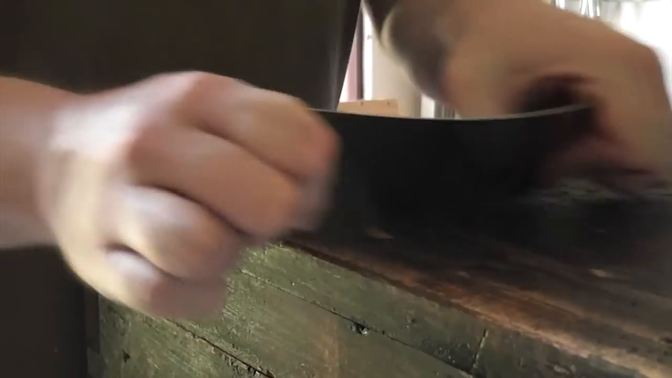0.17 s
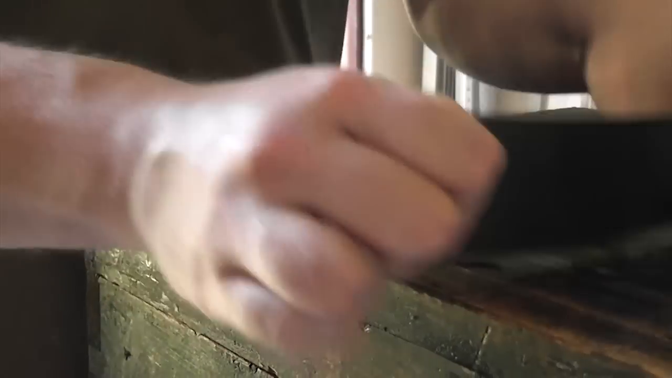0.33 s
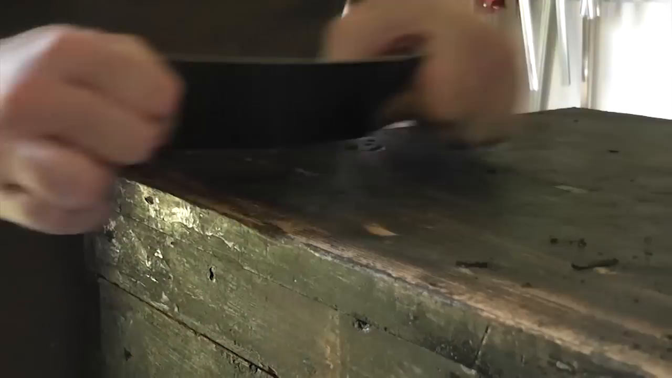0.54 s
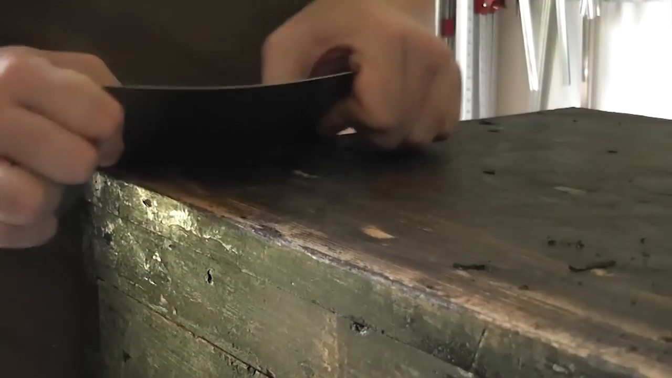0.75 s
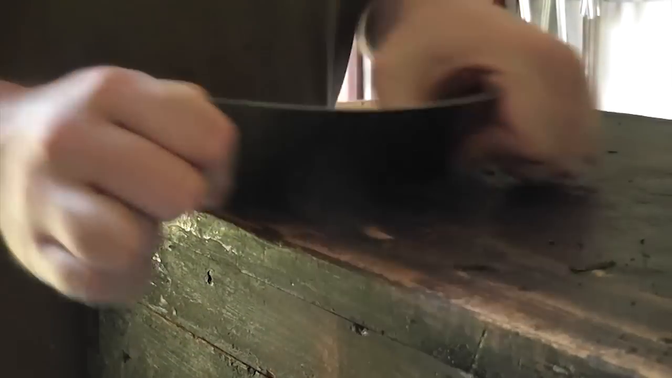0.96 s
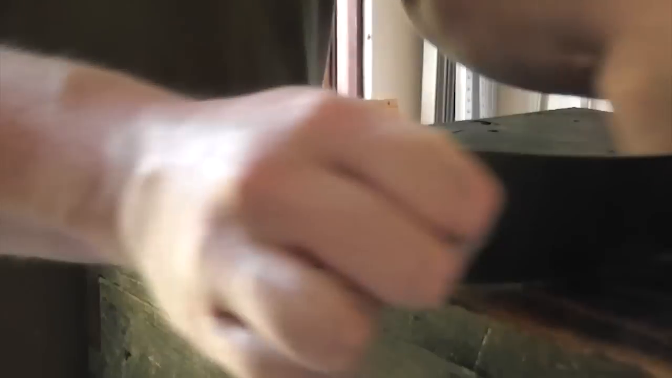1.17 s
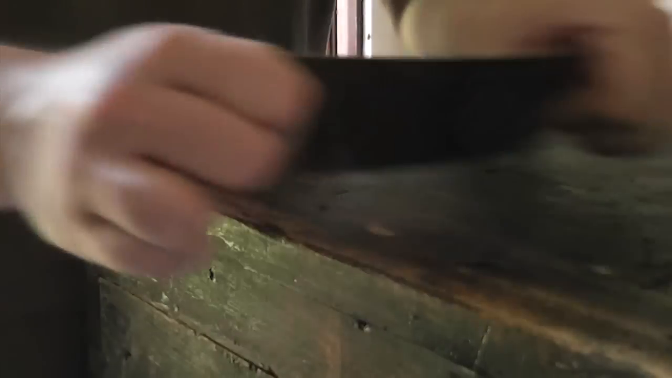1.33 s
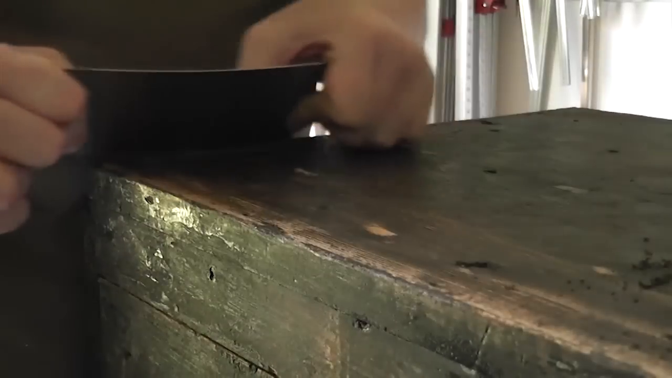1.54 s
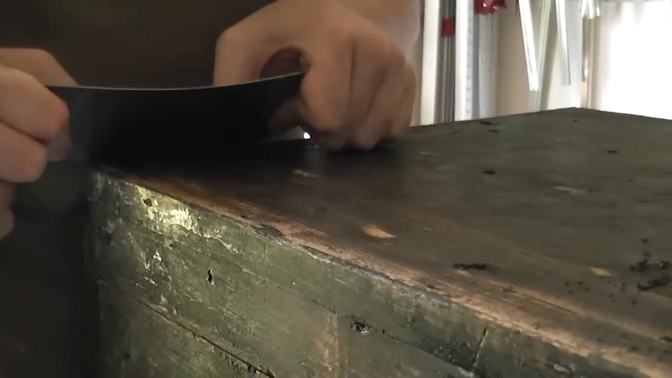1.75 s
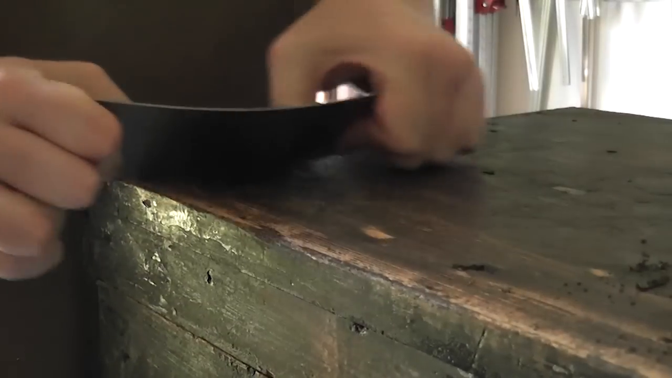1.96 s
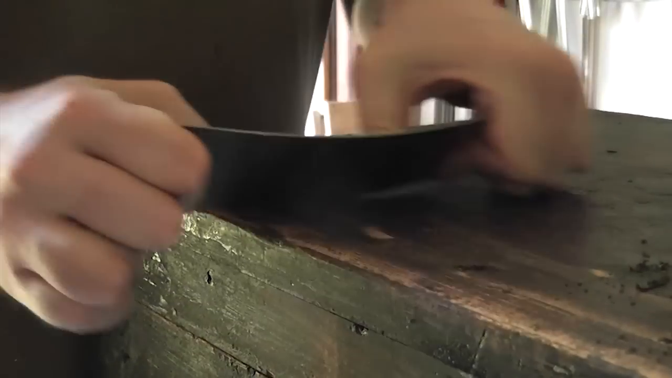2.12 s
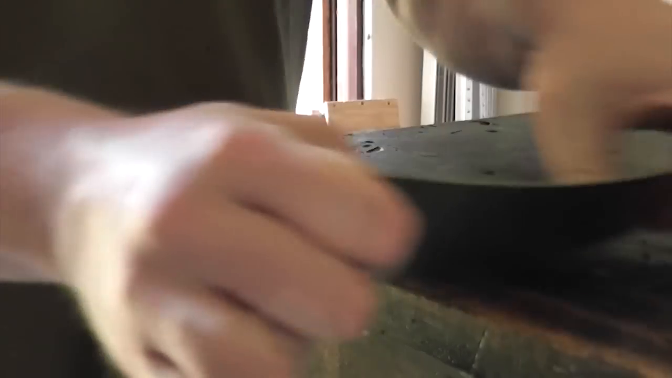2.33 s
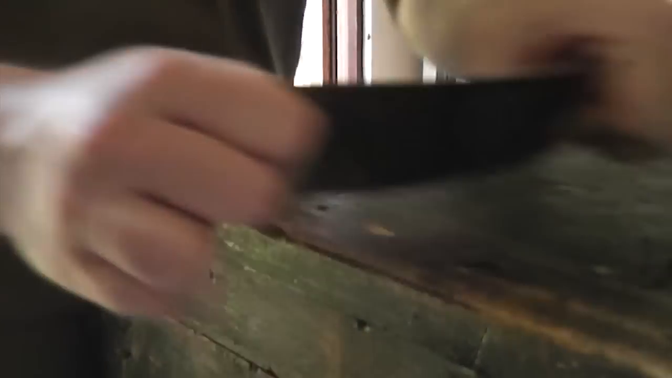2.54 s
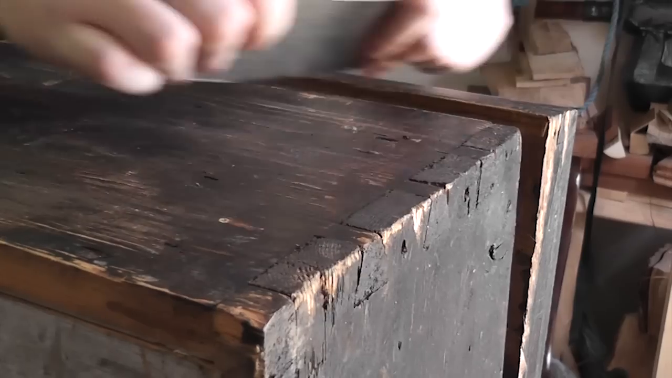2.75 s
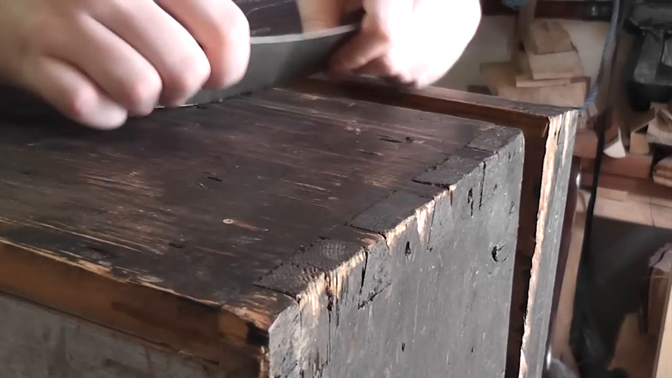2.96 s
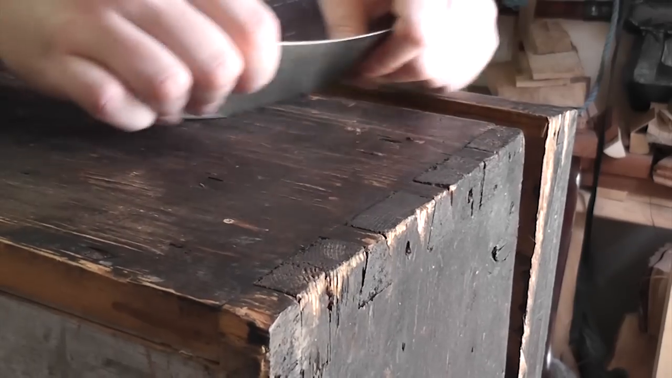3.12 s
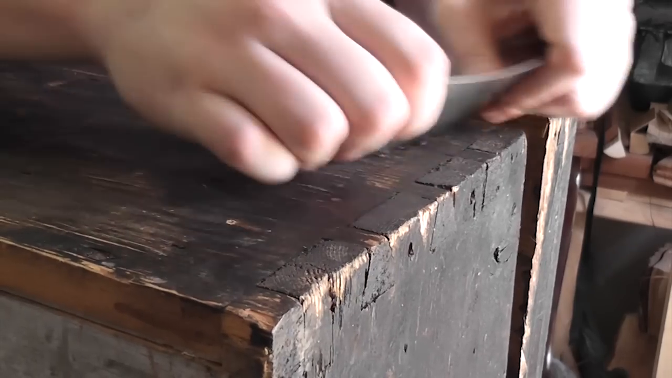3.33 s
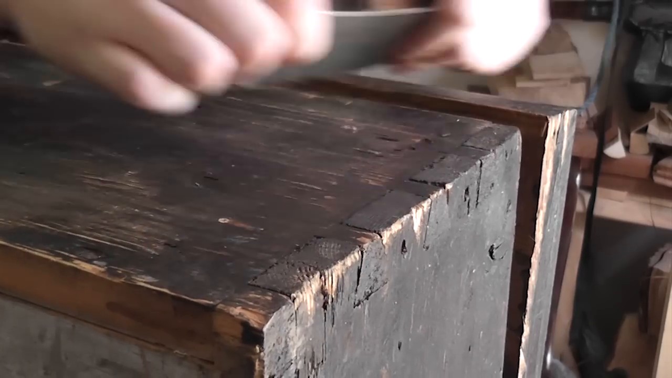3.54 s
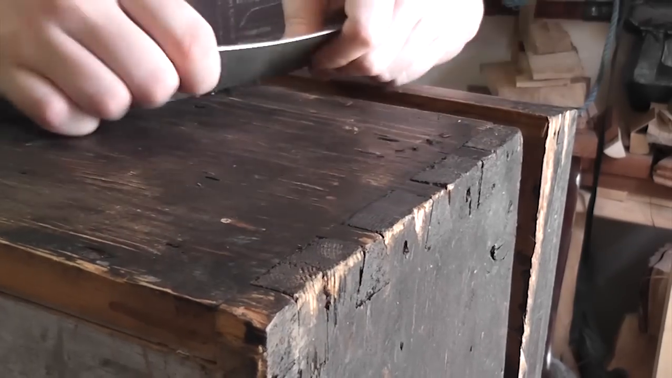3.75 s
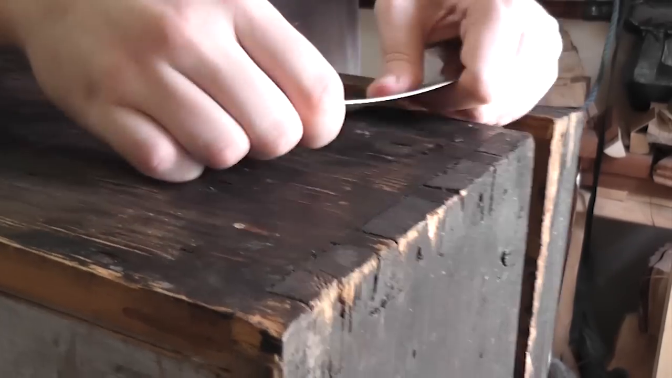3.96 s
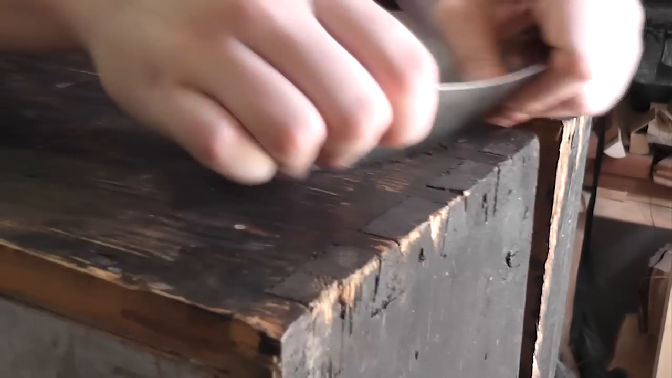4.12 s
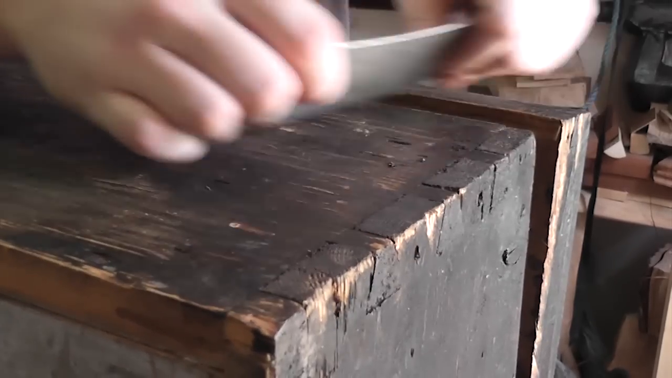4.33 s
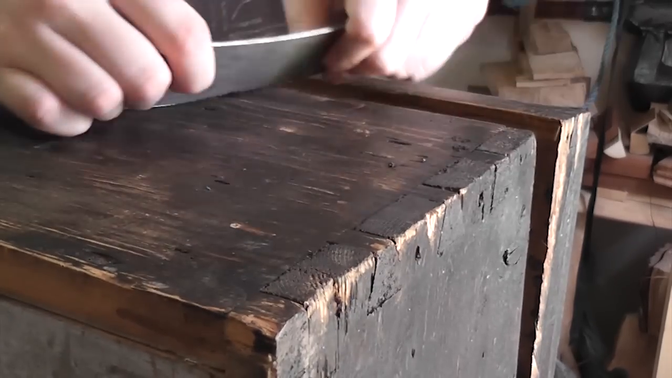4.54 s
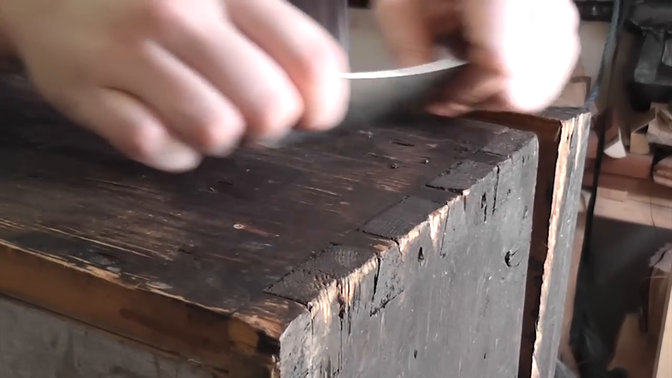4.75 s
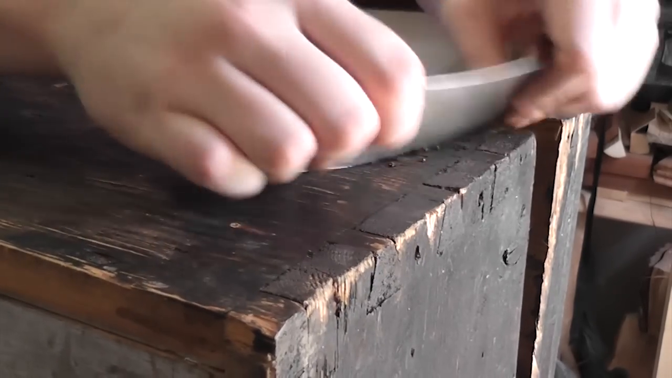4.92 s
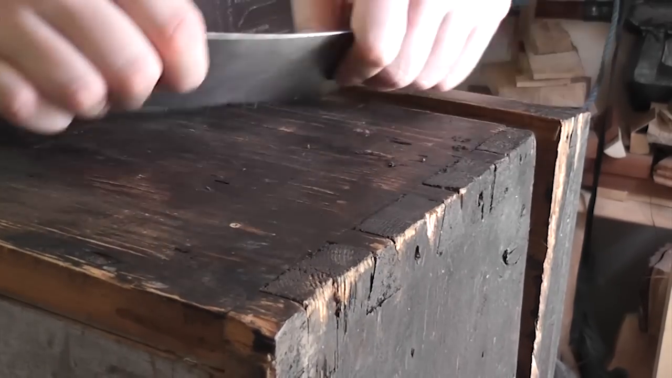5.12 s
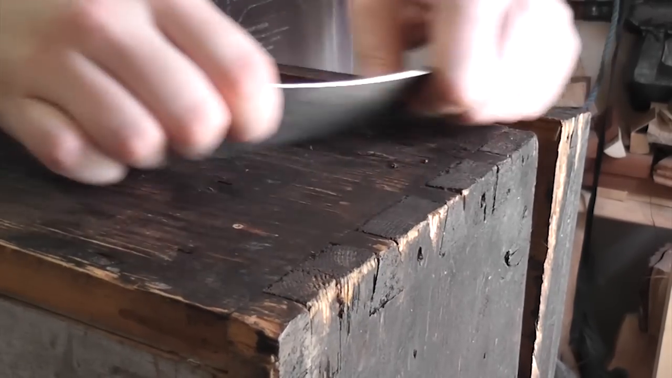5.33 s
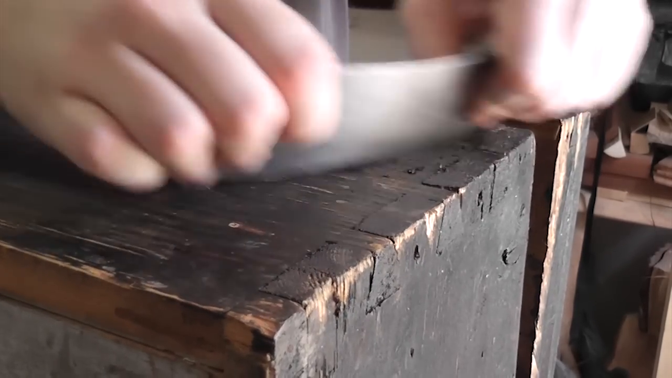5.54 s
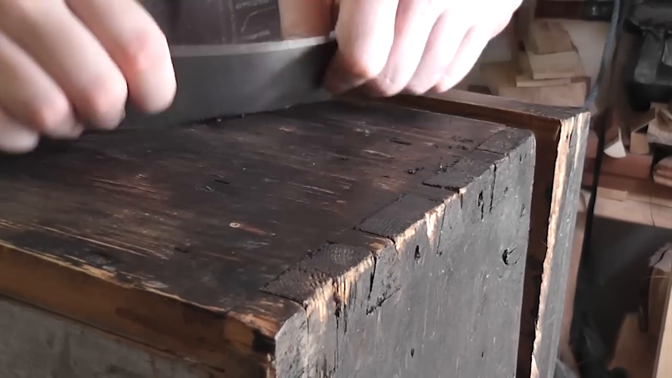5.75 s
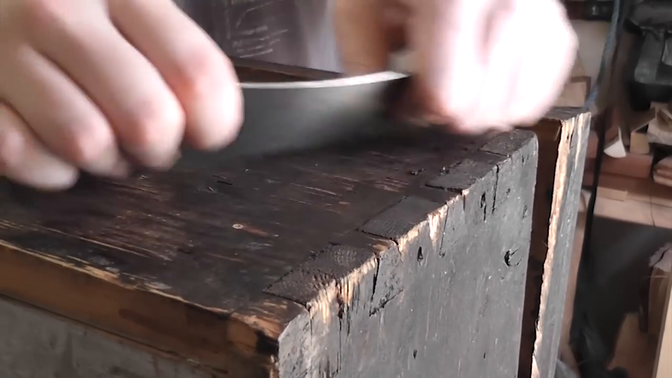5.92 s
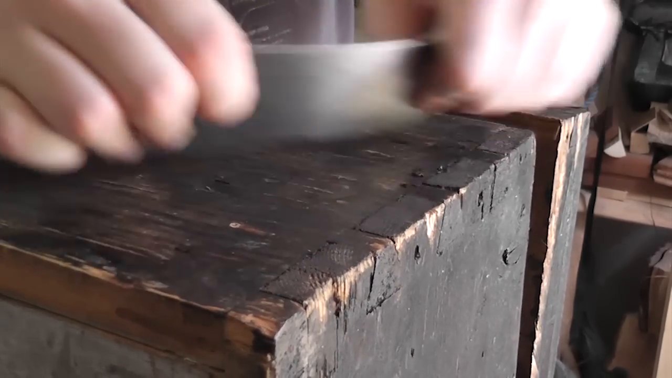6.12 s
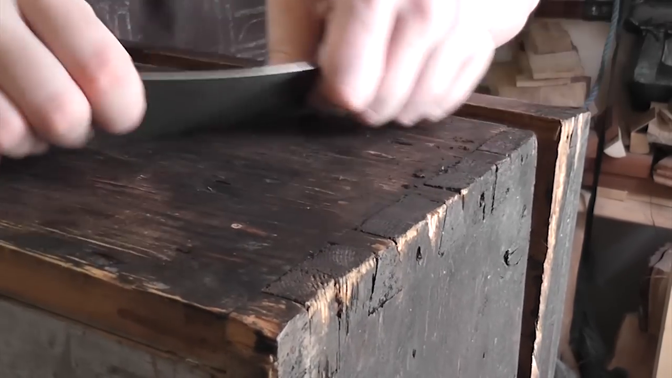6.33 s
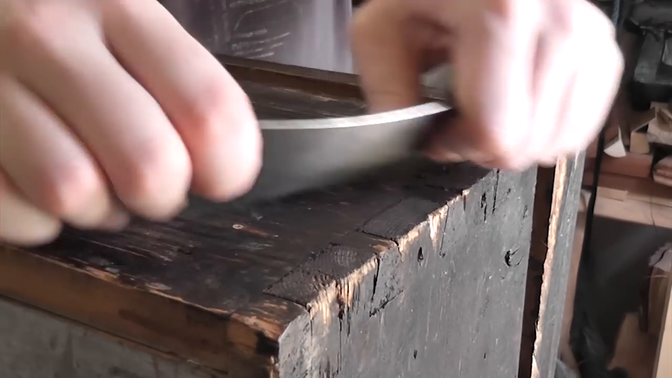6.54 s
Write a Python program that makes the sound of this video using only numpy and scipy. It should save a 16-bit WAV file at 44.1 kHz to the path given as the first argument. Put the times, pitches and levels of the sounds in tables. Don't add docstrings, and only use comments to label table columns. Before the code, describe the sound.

Gritty metal blade strokes hiss and buzz on hollow painted wood, slow at first, then short and hurried with frequent woody knocks.

```python
import sys
import numpy as np
from scipy import signal
from scipy.fft import rfft, irfft
from scipy.io import wavfile
from scipy.ndimage import uniform_filter1d

SR = 44100
rng = np.random.default_rng(int(sys.argv[2]) if len(sys.argv) > 2 else 0)


def how_loud(loudness_db):
    steps = np.asarray(loudness_db, float) / 20
    return 10 ** steps


def file_out(sig):
    cols = np.atleast_2d(sig).T
    lim = np.clip(cols, -1, 1)
    pcm = np.round(lim * 32767).astype(np.int16)
    wavfile.write(sys.argv[1], SR, pcm)


N = 294588
CUT_S = 2.64


def unit(x):
    return x / np.sqrt(np.mean(x ** 2))


def colour(x, table):
    hz, db = np.transpose(table)
    f = np.maximum(np.fft.rfftfreq(N, 1 / SR), 1)
    gain = how_loud(np.interp(np.log(f), np.log(hz), db))
    return unit(irfft(rfft(x) * gain, N))


def ring(x, hz, width_hz):
    return signal.lfilter(*signal.iirpeak(hz, hz / width_hz, fs=SR), x)


def walk(rate_hz):
    k = int(SR / rate_hz)
    held = np.repeat(rng.standard_normal(N // k + 1), k)
    return 1.297 * uniform_filter1d(uniform_filter1d(held, k), k)[:N]


# f/Hz, density/dB per Hz
YARD_SPECTRA = [
    [(15, -44), (25, -24), (60, -9), (115, -14.5), (306, -15), (349, -12), (429, -9.5), (488, -6.5), (665, -8.5), (718, -6.5), (954, -9.5), (1170, -9), (1520, -23.5), (5530, -37), (12000, -42), (15600, -81), (22000, -120)],
    [(15, -41), (25, -19), (84, -5.5), (231, -12), (475, -8), (1820, -15.5), (3950, -22.5), (10800, -42), (12000, -49), (15600, -79), (22000, -120)],
]
YARD_RMS_DB = (-40.5, -47.5)


def yard(first):
    mid, side = rng.standard_normal((2, N))
    opposed = np.array([[1], [-1]])
    places = []
    for spectrum, rms_db in zip(YARD_SPECTRA, YARD_RMS_DB):
        stereo = colour(mid, spectrum) + 0.32 * colour(side, spectrum) * opposed
        places.append(how_loud(rms_db) * stereo)
    return np.where(first, *places) * how_loud(0.4 * walk(4.5))


def room(x):
    t60_s, level_db, low_hz, high_hz = 0.13, -7.5, 380, 2080
    t = np.arange(SR // 2) / SR
    tail = rng.standard_normal((2, len(t))) * how_loud(-60 * t / t60_s) * (t > .002)
    tail = signal.lfilter(*signal.butter(2, [low_hz, high_hz], "band", fs=SR), tail)
    tail /= np.sqrt(np.sum(tail ** 2, axis=1, keepdims=True) * SR / 2 / high_hz)
    return how_loud(level_db) * signal.fftconvolve(x[None], tail, axes=1)[:, :N]


# t/s, blow/dB, tick/dB, thump/dB, contact/ms
LANDINGS = [(0.679, -2.5, -33, -21, 0.27), (1.691, -39, -61, -27.5, 0.45), (2.486, -21, -43, -10.5, 0.64),
            (2.678, -6.5, -52, -20, 1), (2.929, 0.5, -32.5, -26, 0.23), (3.079, -21, -48, -54, 0.31),
            (3.467, -5, -44, -31, 1), (3.767, 1.5, -27.5, -14, 0.13), (4.024, -12, -34, -27, 0.5),
            (4.152, 1.5, -32, -22, 1), (4.294, -15.5, -33.5, -24, 0.5), (4.576, 0, -22, -13.5, 0.15),
            (4.942, -10, -34, -31, 0.53), (5.071, -8, -47, -29, 0.5), (5.196, -9, -40, -30, 0.29),
            (5.593, -21, -46, -20, 0.4), (5.757, -13, -38, -48, 0.29), (6.279, -11.5, -29, -39, 1)]


def blows():
    out = np.zeros(N)
    t = np.arange(SR // 4) / SR
    modes = BIG_PANELS + LID_LOW + LID_HIGH + BLADE_MODES
    hz, width_hz, struck_db = np.transpose([(m[0], m[1], m[-1]) for m in modes])
    big = hz < 230
    rings = np.exp(-np.pi * np.outer(width_hz, t)) * np.sin(2 * np.pi * np.outer(hz, t))
    rings[big] *= 1 - np.exp(-(t / .006) ** 2)
    sign = (-1) ** np.arange(len(hz))
    spot_db = rng.standard_normal((len(LANDINGS), len(hz)))
    fade = np.exp(-t / 0.0023) + 0.31 * np.exp(-t / 0.019)
    ticks = rng.standard_normal((len(LANDINGS), len(t))) * fade
    ticks = signal.lfilter(*signal.butter(2, [1500, 4500], "band", fs=SR), ticks)
    for (s, db, tick_db, thump_db, ms), scatter_db, tick in zip(LANDINGS, spot_db, ticks):
        push = np.hanning(max(int(ms * SR / 1000), 2) + 2)
        blow_db = np.where(big, thump_db + 16.5, db - 5)
        gain = sign * how_loud(struck_db + scatter_db + blow_db)
        hit = np.convolve(gain @ rings, push / push.sum())[:len(t)]
        hit = hit + how_loud(tick_db + 8.5) * tick
        i = int(s * SR)
        out[i:i + len(t)] += hit[:N - i]
    return out


def chips(spread_db, chatter_db):
    size = how_loud(spread_db * rng.exponential(size=N) + chatter_db * walk(60))
    return unit(rng.standard_normal(N) * size)


def rasped(modes, force_db, first, wander_db, dulling):
    tilt_db = dulling * np.clip(force_db + 26.0, -20, 0)
    grit = chips(spread_db=2.0, chatter_db=1.5)
    out, power = 0, 0
    for k, (hz, width_hz, first_db, second_db, _) in enumerate(modes):
        free = ring(grit, hz, width_hz) ** 2
        even = (free.mean() / uniform_filter1d(free, int(.06 * SR))) ** 0.24
        reach_db = np.where(first, first_db, second_db) + wander_db * walk(9)
        reach_db = reach_db + tilt_db * np.log2(hz / modes[2][0])
        out = out + (-1) ** k * ring(grit * even * how_loud(force_db + reach_db), hz, width_hz)
        power += free.mean() * how_loud(first_db + second_db)
    return out / np.sqrt(power)


# f/Hz, width/Hz, rasped at first place/dB, at second/dB, struck/dB
BIG_PANELS = [(98.6, 29, -9, -11.5, -44), (123.4, 40, -6, -47, -24.5), (162.8, 26.6, 4, 4.5, -19.5),
              (196, 92, -8, -18.5, -36)]
LID_LOW = [(272.2, 13.7, -2, -11.5, -15.5), (295.7, 15.3, -14, -4.5, -13), (327.8, 20.6, 1.5, 0.5, -17),
           (400.3, 39.4, -11.5, -8, -6), (462, 132, -11, -10.5, -15), (571.8, 29.4, -7, -4, -23),
           (637, 24, -8.5, -9.5, -17)]
LID_HIGH = [(755, 62, 2.5, 2, -6), (889, 150, 0.5, 0.5, -6.5), (1064, 92, 2.5, 3.5, -10.5),
            (1207, 109, 3.5, 3, -4.5), (1326, 78, 4.5, 1.5, -12), (1523, 93, 1, -0.5, -13.5),
            (1740, 320, -4.5, -4.5, -33), (2010, 98, -8, -10, -20.5), (2320, 180, -11, -10.5, -35)]


def chest(buzz_db, drone_db, thump_db, first):
    buzz = rasped(LID_HIGH, buzz_db, first, wander_db=1.9, dulling=0.29)
    drone = rasped(LID_LOW, drone_db, first, wander_db=3.0, dulling=0.04)
    thump = rasped(BIG_PANELS, thump_db, first, wander_db=3.5, dulling=0.055)
    return buzz + drone + thump


def sheet(x, t60_s, wet):
    t = np.arange(SR // 20) / SR
    tails = rng.standard_normal((2, len(t))) * how_loud(-60 * t / t60_s)
    tails /= np.linalg.norm(tails, axis=1, keepdims=True)
    a, b = signal.oaconvolve(x[None], tails, axes=1)[:, :N]
    bend_rad = 2.47 * walk(7)
    return x + wet * (np.cos(bend_rad) * a + np.sin(bend_rad) * b)


# f/Hz, width/Hz, rasped/dB, struck/dB
BLADE_MODES = [(2670, 320, 3, -37), (3150, 310, -4.5, -12), (3750, 100, -7.5, -23), (5760, 340, -19, -40),
               (8360, 74, -55, -50), (12000, 340, -20, -50)]
# f/Hz, density/dB per Hz
HISS_SPECTRA = [
    [(880, -48), (1500, 2), (2300, 1), (2550, -9), (3610, -1), (4220, -4), (5630, -4), (8550, -7.5), (11200, -5.5), (12000, -6), (15600, -63), (22000, -120)],
    [(880, -29), (1500, -3.5), (2090, -1), (2510, -11.5), (3640, -6), (4570, -11), (6300, -10.5), (8180, -13), (11100, -8), (12000, -12), (15600, -73), (22000, -120)],
]


def burr(force_db, top_db, first):
    grit = chips(spread_db=1.0, chatter_db=0.67)
    hiss = np.where(first, colour(grit, HISS_SPECTRA[0]), colour(grit, HISS_SPECTRA[1]))
    hiss = hiss + sum(how_loud(db) * ring(hiss, hz, w) for hz, w, db, _ in BLADE_MODES)
    hiss = unit(sheet(hiss, t60_s=0.029, wet=0.64))
    fine = signal.filtfilt(*signal.butter(2, 6000, "high", fs=SR), hiss)
    shaped = hiss - fine + fine * how_loud(np.clip(top_db + 7.0, -25, 6))
    return shaped * how_loud(force_db)


def slope(t, start_s, top_s, ease_s, end_s):
    rise = (t - top_s) / max(top_s - start_s, 1e-3)
    fall = (ease_s - t) / max(end_s - ease_s, 1e-3)
    return 30 * np.minimum(np.minimum(rise, fall), 0)


# t/s, thump/dB, builds/s, dies/s
WEIGHT_SHIFTS = [(.1, -23, .07, 0.1), (.24, -32.5, .4, .3), (.382, -27.5, .15, .15),
                 (.688, -22.5, .03, 0.095), (.77, -39, .15, .1), (1.28, -26, .1, .1),
                 (1.69, -23.5, .012, 0.083), (1.85, -32.5, .1, .1), (2.06, -28.5, .12, .15),
                 (2.334, -29.5, 0.37, .16), (2.51, -23, 0.11, 0.11), (2.74, -32, 0.33, 0.15),
                 (2.938, -16.5, 0.014, 0.033), (3.04, -33.5, 0.12, 0.091), (3.15, -36, .15, 0.35),
                 (3.34, -33, 0.14, .2), (3.518, -24.5, .2, 0.2), (3.775, -26, 0.011, 0.065),
                 (4.03, -29, 0.082, 0.2), (4.18, -20, 0.11, 0.13), (4.33, -36.5, 0.25, .3),
                 (4.585, -32.5, .015, 0.13), (4.88, -29.5, .09, 0.23), (5.0, -29, 0.35, .25),
                 (5.28, -40, 0.23, .2), (5.612, -30, 0.075, 0.17), (5.81, -35, 0.13, .1),
                 (6.126, -33.5, .1, .04), (6.29, -33.5, 0.033, .05), (6.66, -33, 0.28, .2)]


def rocks(t):
    power = 0
    for s, db, builds_s, dies_s in WEIGHT_SHIFTS:
        power = power + how_loud(2 * (db + slope(t, s - builds_s, s, s, s + dies_s)))
    return power


# t/s, hiss/dB, lid buzz/dB, drone/dB, dies/s
SKIDS = [(.65, -42.5, -50, -46, .2), (.684, -37, -24.5, -22, 0.064), (1.585, -48, -55, -58, 0.14),
         (2.631, -46.5, -48, -36, 0.081), (2.682, -66, -33, -23.5, 0.085), (2.812, -62, -41, -45, .15),
         (2.868, -56, -55, -55, .1), (2.935, -55, -28.5, -24, .13), (3.026, -40.5, -36.5, -26.5, .1),
         (3.084, -36.5, -34, -26, .1), (3.124, -31.5, -30, -25.5, .1), (3.46, -54, -26.5, -20, 0.16),
         (3.611, -41.5, -40, -36.5, 0.14), (3.774, -47, -27, -24.5, 0.12), (4.03, -34, -23.5, -27.5, 0.12),
         (4.3, -45.5, -32, -30.5, 0.16), (4.389, -43, -46, -48, .3), (4.463, -41, -40, -42, 0.11),
         (4.582, -34.5, -21.5, -21, 0.086), (4.934, -33.5, -26, -19, 0.11), (5.196, -45, -30.5, -22, 0.13),
         (5.591, -39.5, -27, -24, .11), (5.755, -34.5, -25, -19.5, 0.12), (5.69, -52, -50, -42, 0.33)]


def slips(t):
    attack_s, tail_db, tail_stretch = 0.0095, -14.5, 2.8
    slip_bright_db = (-7, -10)
    power, bright = 0, 0
    for s, *levels_db, dies_s in SKIDS:
        rattle = how_loud(2 * slope(t, s - attack_s, s, s, s + dies_s))
        tail = how_loud(2 * (tail_db + slope(t, s - attack_s, s, s, s + tail_stretch * dies_s)))
        felt = how_loud(2 * np.array(levels_db))[:, None] * (rattle + tail)
        power = power + felt
        bright = bright + felt[0] * slip_bright_db[int(s > CUT_S)]
    return power, bright


# touches/s, bites/s, eases/s, off/s, hiss at bite/dB
EDGE_STROKES = [(-.2, .03, .355, .45, -27.5), (0.753, 0.816, 0.85, 0.96, -35.5),
                (0.787, 0.926, 1.245, 1.33, -26.5), (1.772, 1.903, 1.94, 2.2, -34),
                (1.794, 2.095, 2.415, 2.556, -28.5), (3.11, 3.186, 3.23, 3.35, -28.5),
                (3.172, 3.286, 3.375, 3.53, -27), (3.812, 3.902, 3.98, 4.13, -32),
                (4.073, 4.081, 4.167, 4.31, -33), (4.57, 4.713, 4.817, 5.08, -34),
                (5.065, 5.068, 5.107, 5.2, -27), (5.248, 5.291, 5.48, 5.615, -37),
                (5.842, 5.873, 6.06, 6.15, -29), (6.275, 6.279, 6.33, 6.42, -31.5),
                (6.374, 6.432, 6.72, 7.2, -27.5)]
# hiss swell/dB, lid buzz/dB, drone/dB, brightness at bite/dB
HAND_GRIP = [(0.5, -31.5, -29, -1), (-1, -31, -35, -7), (-2, -30.5, -30, -4), (-.8, -31.5, -32, -9.5),
             (2, -29, -28, -4), (0.5, -27.5, -22, -3), (1.5, -24.5, -26.5, -4), (0, -31.5, -29.5, 1.5),
             (9, -25.5, -24, -4.5), (11, -32, -31.5, -2), (1, -22.5, -26, -14), (14, -30, -31, 3),
             (5, -27.5, -31.5, -1), (-3, -26.5, -26, -5), (-1.5, -25, -33.5, -2.5)]


def strokes(t):
    press_s, linger_s = 0.049, 0.02
    lid_speed, drone_speed = 0.52, 0.23
    lid_swell, drone_swell = 0.71, 0.48
    arch_db = 2
    sag_db, thump_under_db = (-4.5, 0), (-11.5, -19)
    skid_db = -10
    wear_s, wear_db = 0.2, (1, -11)
    power, bright = 0, 0
    for (touch, bite, ease, off, db), grip in zip(EDGE_STROKES, HAND_GRIP):
        swell_db, lid_db, drone_db, bright_db = grip
        place = int(touch > CUT_S)
        speed = slope(t, touch, bite, ease, off)
        weight = slope(t, touch, min(touch + press_s, bite), ease + linger_s, off + linger_s)
        along = np.clip((t - bite) / (ease - bite), 0, 1)
        hiss = db + speed + swell_db * along + arch_db * np.sin(np.pi * along)
        lid = lid_db + lid_speed * speed + (1 - lid_speed) * weight
        lid = lid + lid_swell * swell_db * (along - .5)
        drone = drone_db + drone_speed * speed + (1 - drone_speed) * weight
        drone = drone + (drone_swell * swell_db + sag_db[place]) * (along - .5)
        felt = how_loud(2 * np.array([hiss, lid, drone, drone + thump_under_db[place]]))
        wear = wear_db[place] * min((ease - bite) / wear_s, 1) * along ** 2
        skid = skid_db * np.clip((t - ease) / (off - ease), 0, 1)
        power = power + felt
        bright = bright + felt[0] * (bright_db + wear + skid)
    return power, bright


# hiss/dB, buzz/dB, drone/dB, thump/dB
IDLE_DB = ((-58, -49, -48, -55), (-61, -56.5, -56, -56.5))


def hands():
    t = np.arange(0, N, 32) / SR
    power = how_loud(2 * np.array(IDLE_DB).T[:, (t > CUT_S).astype(int)])
    bright = power[0] * -15
    stroke_power, stroke_bright = strokes(t)
    slip_power, slip_bright = slips(t)
    power += stroke_power
    power[:3] += slip_power
    power[-1] += rocks(t)
    bright = (bright + stroke_bright + slip_bright) / power[0]
    curves = (*(10 * np.log10(power)), bright)
    return [np.interp(np.arange(N) / SR, t, c) for c in curves]


def scene():
    hiss_db, buzz_db, drone_db, thump_db, top_db = hands()
    first = np.arange(N) / SR < CUT_S
    near = burr(hiss_db, top_db, first) + chest(buzz_db, drone_db, thump_db, first) + blows()
    near = signal.lfilter(*signal.butter(2, 78, "high", fs=SR), near)
    return near + room(near) + yard(first)


def thrift(x, hole_db, spread_db, quiet_db):
    loud_edge_hz, quiet_edge_hz = 1490, 2440
    pair = [(x[0] + x[1]) / 2, (x[0] - x[1]) / 2]
    hz, _, (mid, side) = signal.stft(pair, SR, nperseg=1024)
    power = abs(mid) ** 2 + 1e-20
    whole_db = 10 * np.log10(power.sum(axis=0))
    band = np.arange(len(hz)) // 8
    band_db = 10 * np.log10(np.add.reduceat(power, np.arange(0, len(hz), 8)))
    limit_db = hole_db + spread_db * rng.standard_normal(band_db.shape)
    hole = band_db - .6 * whole_db < limit_db
    mid = mid * ~(hole[band] & (hz[:, None] > 4500))
    edge_hz = np.where(whole_db > quiet_db, loud_edge_hz, quiet_edge_hz)
    edge_hz = edge_hz * how_loud(1.4 * rng.standard_normal(len(whole_db)))
    side = side * (hz[:, None] < edge_hz)
    mid, side = signal.istft([mid, side], SR)[1][:, :N]
    return np.array([mid + side, mid - side])


def roll_off(x):
    return signal.sosfilt(signal.butter(12, 13200, fs=SR, output="sos"), x)


def record(dry):
    heard = dry - 0.64 * ring(dry, hz=2554, width_hz=50)
    rounded = np.tanh(1.151 * heard) / 1.171
    cut = signal.sosfilt(signal.cheby1(12, .3, 11760, fs=SR, output="sos"), rounded)
    mix = thrift(cut, hole_db=-62.5, spread_db=6.5, quiet_db=-32.5)
    return roll_off(mix)


dry = scene()
out = record(dry)
file_out(out)
```